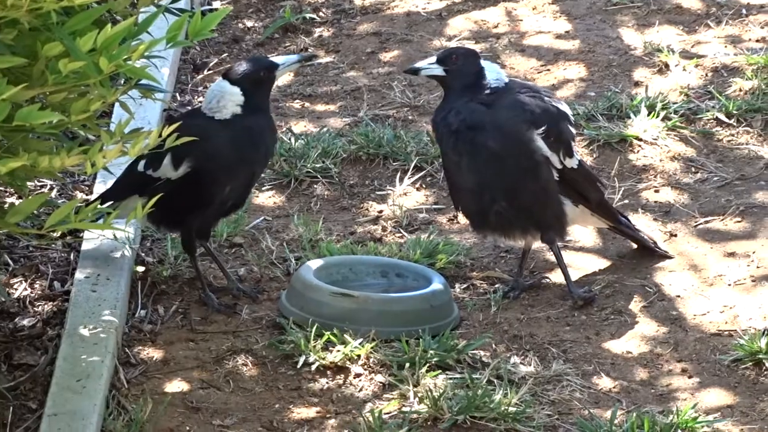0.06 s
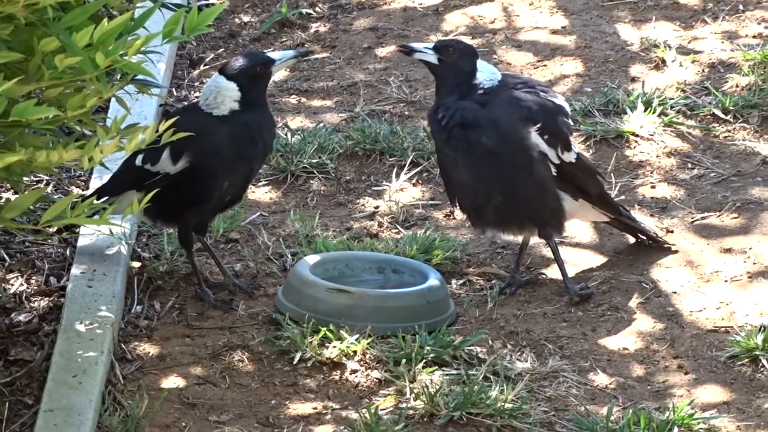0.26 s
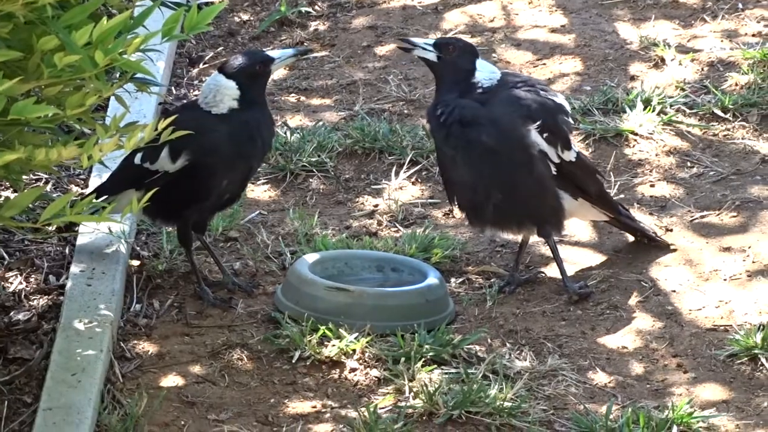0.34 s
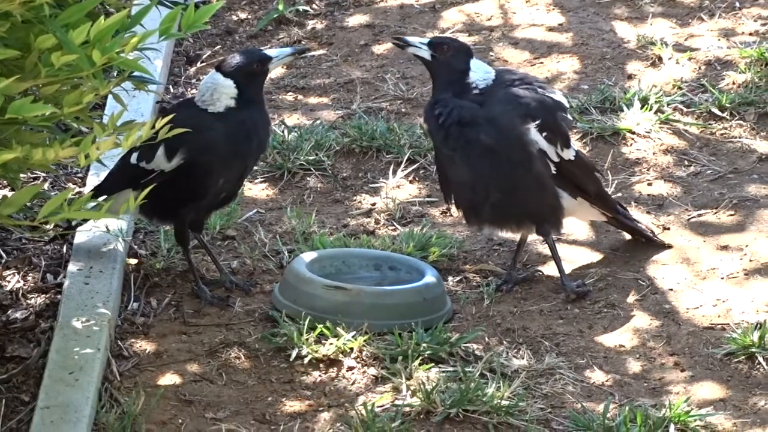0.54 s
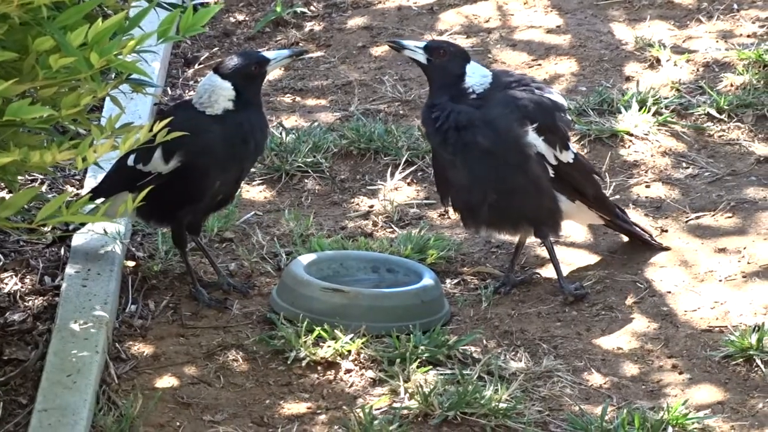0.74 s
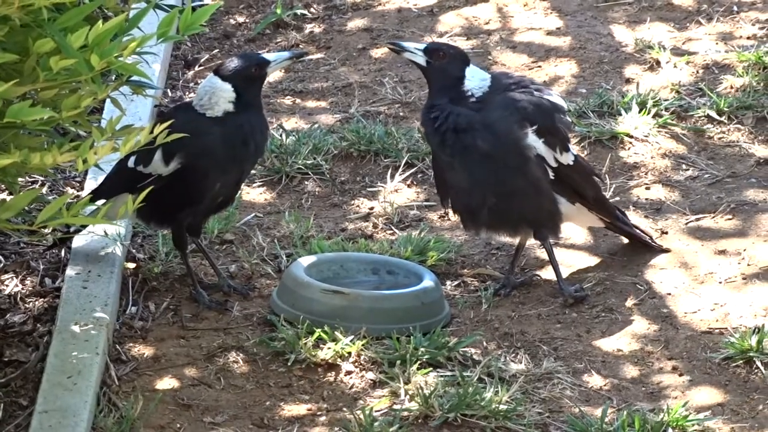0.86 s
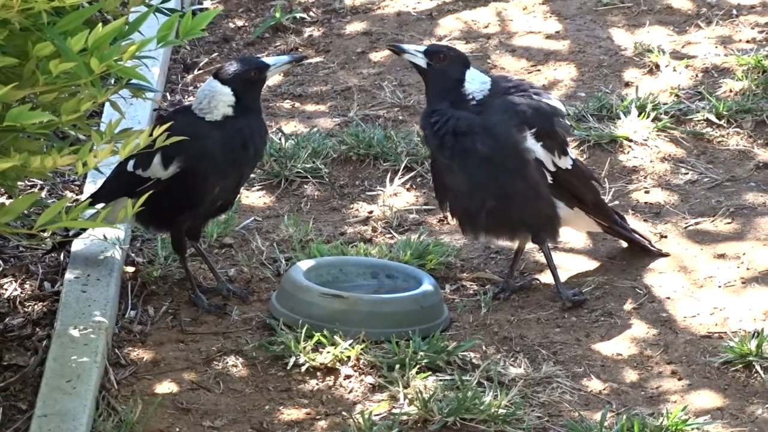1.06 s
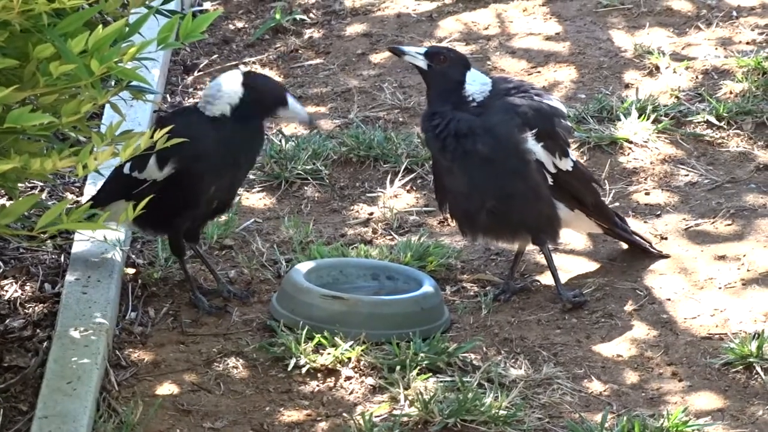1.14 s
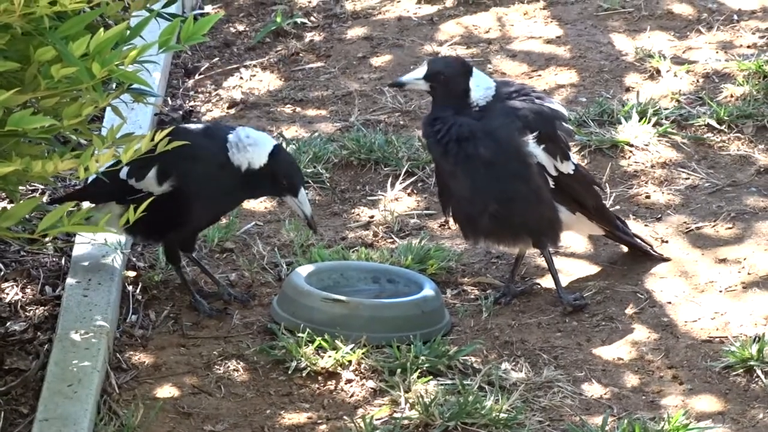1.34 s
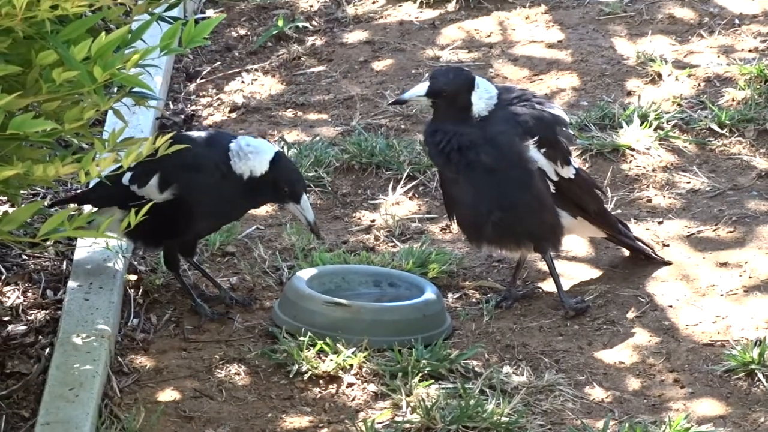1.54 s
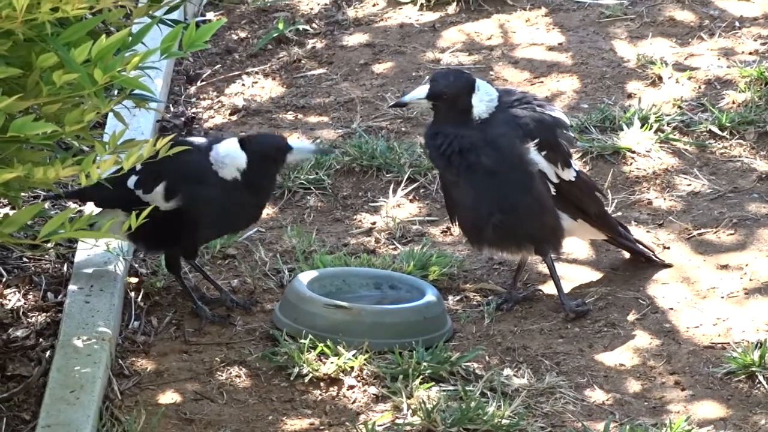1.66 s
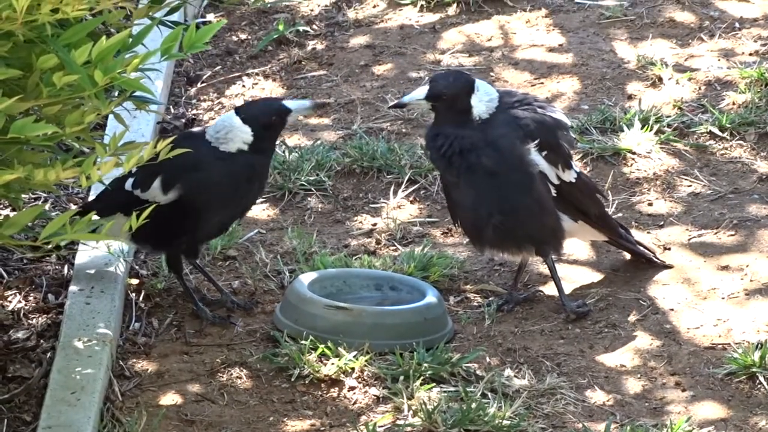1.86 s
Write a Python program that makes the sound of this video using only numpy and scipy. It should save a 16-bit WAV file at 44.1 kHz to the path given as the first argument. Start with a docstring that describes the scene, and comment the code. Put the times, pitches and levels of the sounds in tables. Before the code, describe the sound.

Magpie calls outdoors, fairly close. After faint low rumble, soft hiss and distant hum, a harsh broken squawk jumps and drops at about 0.2-0.4 s, with thin whistled tones beside it. A second short, rough squawk falls at 0.53-0.69 s. From 0.75 to 1.1 s a clearer whistle glides down and breaks into a fluttering rasp. Slight near echoes fade, leaving quiet background.

```python
"""A garden with a low distant rumble, soft hiss and a far hum, kept up throughout as shaped noise and wavering sines.
Two magpies face each other: two short harsh squawks, then a clear falling note that breaks into a rasp.
Each call is one gliding tone with overtones; where it turns harsh, a flutter in the syrinx chops and shakes it.
Plain gliding tones sound beside the first squawk, one near 1400 Hz as its faint late echo, and the falling note.
Two near echoes and a faint decaying tail follow each call; the microphone signal is cut steeply at the top."""
import sys
import numpy as np
from scipy import signal
from scipy.fft import rfft, irfft
from scipy.io import wavfile
from scipy.ndimage import uniform_filter1d

SR = 44100
rng = np.random.default_rng(int(sys.argv[2]) if len(sys.argv) > 2 else 0)


def wav_out(sig):
    """Save sig, one row per channel (or a flat mono array), as 16-bit PCM at SR to the path in sys.argv[1]."""
    wavfile.write(sys.argv[1], SR, np.round(np.clip(np.atleast_2d(sig).T, -1, 1) * 32767).astype(np.int16))


N = 83790
TIME = np.arange(N) / SR
CUTOFF_HZ = 11200   # no overtone is sounded above this
SMEAR_RATE_HZ = 150   # speed of the random phase slips


def from_db(db):
    """Decibels to gain."""
    return 10 ** (np.asarray(db) / 20)


def rms_one(x):
    """Scale to unit level."""
    return x / np.sqrt(np.mean(x ** 2) + 1e-20)


def at_hz(points, hz):
    """Read a spectrum on a log-frequency axis."""
    f, value = np.transpose(points)
    return np.interp(np.log(np.maximum(hz, 1)), np.log(f), value)


def drift(rate_hz):
    """Smooth random motion of spread 1: white noise through two equal low-pass poles."""
    pole = np.exp(-2 * np.pi * rate_hz / SR)
    white = rng.standard_normal(N + SR)
    # The first second is dropped so that the filter has settled
    return rms_one(signal.lfilter([1], [1, -2 * pole, pole * pole], white)[SR:])


def noise(spectrum):
    """Noise of unit level with the given colour."""
    gain = from_db(at_hz(spectrum, np.fft.rfftfreq(N, 1 / SR)))
    return rms_one(irfft(rfft(rng.standard_normal(N)) * gain, N))


def pan(x, db):
    """Place a sound between left and right; db is left minus right."""
    return x * from_db(np.array([[db], [-db]]) / 2)


def running_phase(hz):
    """Phase in radians of a tone whose pitch moves."""
    return 2 * np.pi * np.cumsum(hz) / SR


def sounding(s):
    """One between the first and last time, with soft edges."""
    return uniform_filter1d(1. * ((TIME > s[0]) & (TIME < s[-1])), size=128)


def far_hum():
    """Steady distant tones whose pitch wavers at random, each sliding evenly in level."""
    # Tones of the far hum: (pitch [Hz], level at the start [dB], level at the end [dB])
    hum_tones = [(96.5, -57, -57.5), (172.2, -53.5, -60.5)]
    waver_hz, waver_rate_hz = 3.29, 8.4
    hum = 0
    for hz, start_db, end_db in hum_tones:
        level = from_db(np.linspace(start_db, end_db, N))
        hum = hum + level * np.sin(running_phase(hz + waver_hz * drift(waver_rate_hz)))
    return np.sqrt(2) * hum


def background():
    """Distant rumble and soft hiss from slowly swelling noise, wider in the treble, with the far hum."""
    # Colour of the distant air noise: (frequency [Hz], relative level per Hz [dB])
    air_colour = [(15, -21), (28, -2), (66, -8), (96, -6), (180, -5), (245, -15), (400, -10.5), (650, -18),
                  (1000, -19), (1600, -22.5), (1950, -29), (2350, -25), (4200, -39.5), (6000, -35.5),
                  (8300, -31.5), (11000, -35.5)]
    # How alike left and right are: (frequency [Hz], likeness [0-1])
    likeness = [(40, 0.97), (130, 0.99), (350, 0.81), (700, 0.48), (10000, 0.64)]
    air_db, swell_db, swell_rate_hz = -49, 2.57, 0.6
    hiss_start_db, hiss_rise_s = -1, 0.34   # the treble starts softer

    alike = np.clip(at_hz(likeness, np.fft.rfftfreq(N, 1 / SR)), 0, 1)
    mid = irfft(rfft(noise(air_colour)) * np.sqrt((1 + alike) / 2), N)
    side = irfft(rfft(noise(air_colour)) * np.sqrt((1 - alike) / 2), N)
    air = from_db(air_db + swell_db * drift(swell_rate_hz)) * np.array([mid + side, mid - side])
    rumble = signal.sosfiltfilt(signal.butter(2, 300, fs=SR, output="sos"), air)
    softening = np.clip(1 - (TIME / hiss_rise_s) ** 2, 0, 1)
    hiss = (air - rumble) * from_db(hiss_start_db * softening)
    return rumble + hiss + far_hum()


def call(rows, flutter_hz, chop, swing, shake, hiss_db, tilt_db, hiss_tilt_db):
    """A syrinx tone with overtones; rasp chops it, shakes its pitch, smears the overtones and adds hiss."""
    # Throat and open bill, colouring upper overtones and hiss: (frequency [Hz], relative level [dB])
    throat = [(900, -29), (1400, 8), (2000, 11), (2850, -15), (4100, 11.5), (5200, -1.5), (6200, -0.5),
              (7100, -9), (8150, 10), (9100, 1.5), (10250, 6.5), (10700, -9)]
    flutter_wander, flutter_wander_hz = 0.0969, 38.8   # share of the flutter rate; speed
    shake_rate_hz = 360
    shimmer_db, shimmer_rate_hz = 4.5, 26   # each upper overtone swells and fades by itself
    smear_rad = 1.7
    first_pan_db, octave_pan_db, upper_pan_db = 0.5, 2.5, -2.3

    s, *columns = np.transpose(rows)
    hz, first_db, octave_db, upper_db, rasp = [np.interp(TIME, s, c) for c in columns]
    rasp = np.clip(rasp, 0, 1)

    # The flutter chops the level and swings the pitch; the chopping keeps the mean power
    flutter = np.cos(running_phase(flutter_hz * (1 + flutter_wander * drift(flutter_wander_hz))))
    depth = np.clip(chop * rasp, 0, 1)
    gate = sounding(s) * (1 + depth * flutter) / np.sqrt(1 + depth ** 2 / 2)
    pitch_motion = rasp * (shake * drift(shake_rate_hz) - swing * flutter)
    phase = running_phase(hz * (1 + pitch_motion))

    # Third to tenth harmonics, summed to unit level
    weighted_sum, power = 0, 0
    for k in range(3, 11):
        colour_db = at_hz(throat, k * hz) + tilt_db * np.log2(k)
        weight = from_db(colour_db + shimmer_db * drift(shimmer_rate_hz)) * (k * hz < CUTOFF_HZ)
        slip = smear_rad * rasp * np.sqrt(k / 3) * drift(SMEAR_RATE_HZ)
        weighted_sum = weighted_sum + weight * np.sin(k * phase + slip)
        power = power + weight ** 2 / 2
    overtones = weighted_sum / np.sqrt(power)

    hiss_level = rasp * from_db(hiss_db)
    hiss_colour = [(f, db + hiss_tilt_db * np.log2(f)) for f, db in throat]
    blend = (overtones + hiss_level * noise(hiss_colour)) / np.sqrt(1 + hiss_level ** 2)
    upper = from_db(upper_db) * blend
    first = np.sqrt(2) * from_db(first_db) * np.sin(phase)
    octave_slip = smear_rad / 2 * rasp * drift(SMEAR_RATE_HZ)
    octave = np.sqrt(2) * from_db(octave_db) * np.cos(2 * phase + octave_slip)
    return gate * (pan(first, first_pan_db) + pan(octave, octave_pan_db) + pan(upper, upper_pan_db))


def plain_tone(rows):
    """A plain gliding tone beside a call, slightly blurred by random phase slips."""
    smear_rad = 0.3
    s, hz, db = np.transpose(rows)
    phase = running_phase(np.interp(TIME, s, hz)) + smear_rad * drift(SMEAR_RATE_HZ)
    return np.sqrt(2) * sounding(s) * from_db(np.interp(TIME, s, db)) * np.sin(phase)


def yard(x):
    """Two near echoes off hard surfaces and a faint scattered tail from fences and shrubs."""
    # Hard surfaces near the birds: (delay [s], level [dB], left minus right [dB])
    echoes = [(0.0116, -14.5, 7.5), (.029, -16.5, 0)]
    tail_db, t60_s, onset_s, treble_cut_hz = -16, 0.33, 0.0097, 16000
    near = 0
    for delay, db, pan_db in echoes:
        near = near + from_db(db) * pan(np.interp(TIME - delay, TIME, x), pan_db)

    t = TIME[:SR]
    envelope = from_db(-60 * t / t60_s) * (1 - np.exp(-t / onset_s))
    scatter = rms_one(rng.standard_normal((2, SR)) * envelope) / np.sqrt(SR)
    scatter = signal.lfilter(*signal.butter(1, treble_cut_hz, fs=SR), scatter)
    return near + from_db(tail_db) * signal.fftconvolve(x[None], scatter, axes=1)[:, :N]


def scene():
    """The three calls and the plain tones beside them, the yard's answer, and the background."""
    # Calls: (time [s], pitch [Hz], fundamental [dB], octave [dB], upper overtones and hiss [dB], rasp [0-1])
    first_squawk = [(.174, 1517, -63.5, -85, -76, 0.53), (.219, 1399, -33.5, -71, -57.5, 1),
                    (.232, 1368, -49, -58, -46, 1), (0.236, 1279, -42, -64, -42, 0.89),
                    (.253, 1422, -39, -62, -38.5, 0.7), (.261, 2030, -27.5, -32.5, -43.5, 0.1),
                    (0.265, 2125, -23.5, -29.5, -43, 0.28), (.274, 2019, -25.5, -24, -31, 0),
                    (.282, 1572, -37.5, -71, -39, 1), (0.291, 1408, -30, -57, -35.5, 0.4),
                    (.301, 1294, -36.5, -58, -40.5, 0.33), (.321, 1258, -25.5, -67, -46.5, 0.05),
                    (.334, 1208, -42.5, -70, -39.5, 0.74), (0.365, 1141, -44.5, -37, -46.5, 0.52),
                    (0.401, 1096, -49, -43.5, -72, 0.34)]
    second_squawk = [(.53, 2270, -47, -73, -77, 0.18), (.533, 2130, -34, -52, -60.5, 0.39),
                     (.552, 1498, -51.5, -55.5, -51.5, 0.73), (.563, 2276, -30, -39, -50.5, 0.16),
                     (.579, 2217, -25.5, -43.5, -50.5, 0.13), (0.587, 2061, -28.5, -30.5, -38, 0.87),
                     (0.599, 1837, -31, -39.5, -39, 0.64), (0.616, 1691, -27, -46, -36, 0.99),
                     (0.633, 1714, -24.5, -56.5, -40, 1), (0.65, 1700, -39, -55.5, -61, 1),
                     (.69, 1720, -66, -74.5, -91, 0.44)]
    falling_note = [(0.743, 2440, -52.5, -73, -89, 0.16), (0.777, 2293, -30, -67, -71, 0),
                    (.792, 2223, -32.5, -46.5, -67, 0.11), (.827, 2192, -25.5, -43, -48, .02),
                    (.874, 2161, -29.5, -36, -50.5, 0.11), (.936, 2047, -30.5, -24.5, -46.5, 0),
                    (0.955, 2001, -27.5, -32, -34, .04), (0.965, 1936, -32.5, -31, -40, 0.65),
                    (0.987, 1832, -40.5, -39.5, -45.5, 0.62), (1.028, 1739, -38, -39, -45, 0.51),
                    (1.059, 1954, -28.5, -40, -52, 0.61), (1.071, 1893, -50, -63, -62, 0.32),
                    (1.077, 1670, -36, -53, -56, 0.43), (1.088, 1680, -32.5, -56, -60, 0.21),
                    (1.106, 1707, -46.5, -89, -78, 0.29)]
    # Voice of each call: (flutter [Hz], chop depth [0-1], pitch swing [share], random pitch shake [share],
    # hiss relative to overtones at full rasp [dB], overtone tilt [dB/octave], hiss tilt [dB/octave])
    voices = [(265, 0.43, 0.0081, .02, 13, 1, -4.5), (153.1, 0.5, 0.035, 0.0062, 0, -1.5, 6.5),
              (105.3, 0.78, 0.037, .01, -10, -13, 13)]
    # Plain gliding tones beside the calls; the one near 1400 Hz is a faint late echo of the first squawk.
    # Each is a list of (time [s], pitch [Hz], level [dB])
    plain_tones = [
        [(.231, 2400, -52), (.237, 2300, -33), (.244, 2127, -29), (.251, 2110, -29), (.257, 2150, -46)],
        [(.24, 1070, -43), (.256, 1040, -35), (.264, 1030, -50)],
        [(.303, 2600, -55), (.342, 2333, -30), (.362, 2250, -27), (.402, 2225, -54)],
        [(.325, 1500, -53), (.36, 1410, -46), (.412, 1394, -52)],
        [(.757, 3750, -70), (.77, 3450, -61), (.808, 3050, -69)],
    ]

    calls = (first_squawk, second_squawk, falling_note)
    birds = sum(call(rows, *voice) for rows, voice in zip(calls, voices))
    birds = birds + sum(plain_tone(rows) for rows in plain_tones)
    return birds + yard(birds.mean(axis=0)) + background()


def record(dry):
    """The microphone signal, its top cut steeply by an elliptic low-pass."""
    top_cut = signal.ellip(12, .1, 80, CUTOFF_HZ - 100, fs=SR, output="sos")
    return signal.sosfilt(top_cut, dry)


dry = scene()
out = record(dry)
wav_out(out)
```